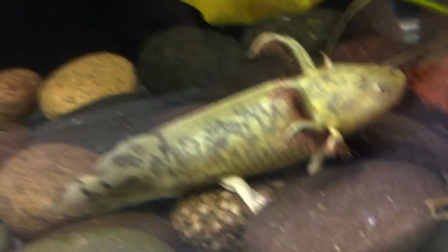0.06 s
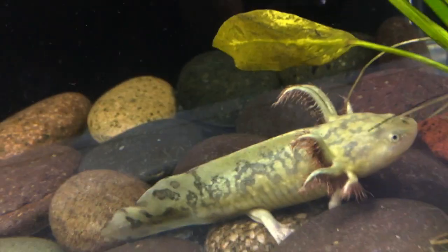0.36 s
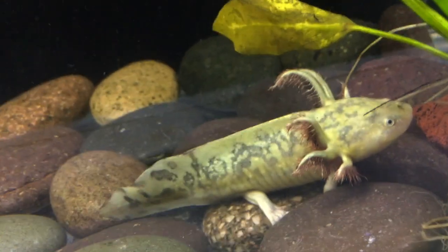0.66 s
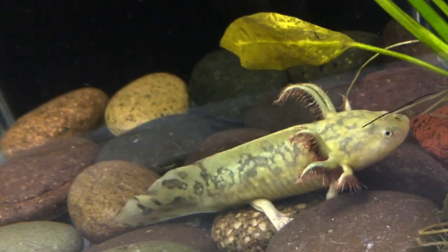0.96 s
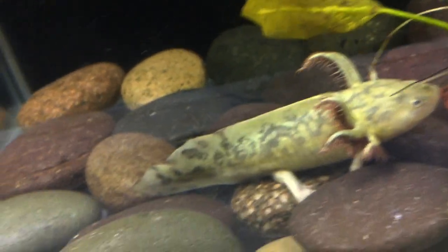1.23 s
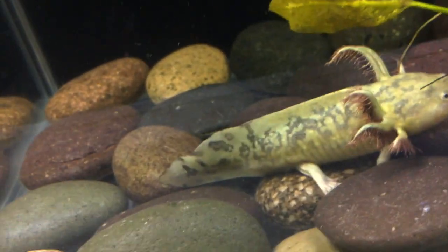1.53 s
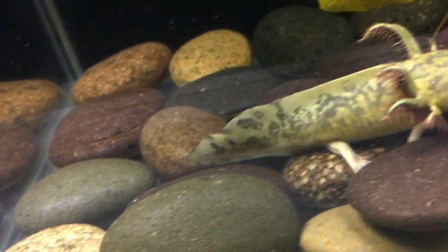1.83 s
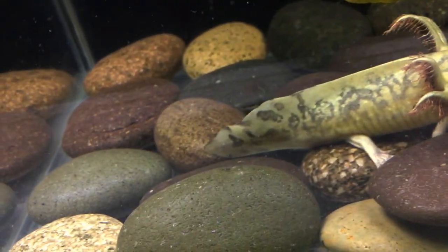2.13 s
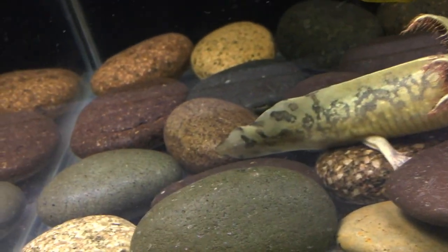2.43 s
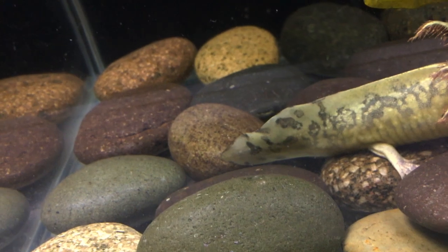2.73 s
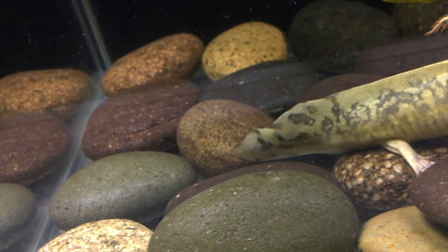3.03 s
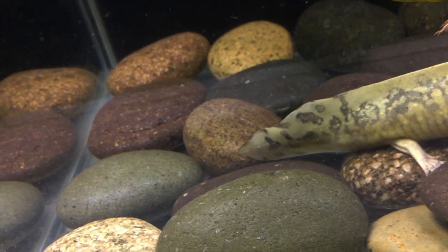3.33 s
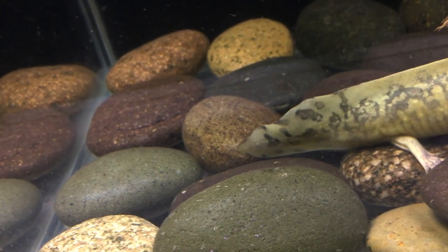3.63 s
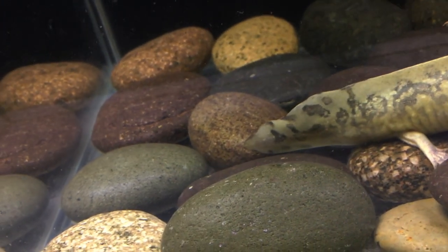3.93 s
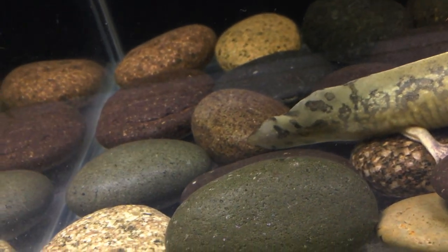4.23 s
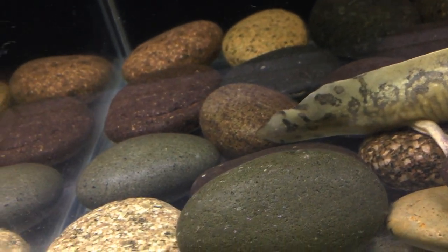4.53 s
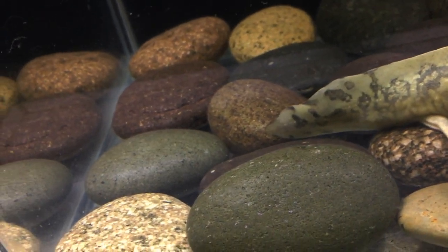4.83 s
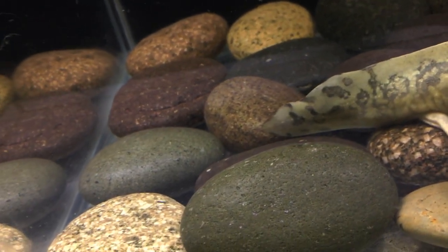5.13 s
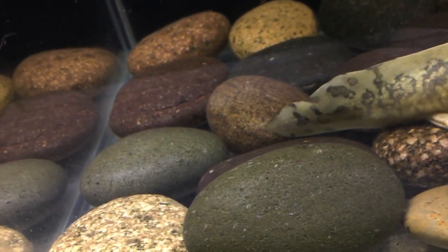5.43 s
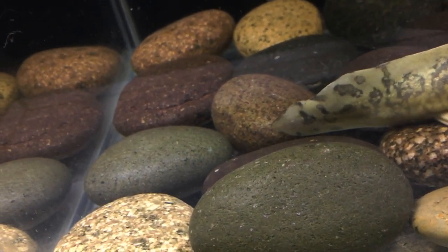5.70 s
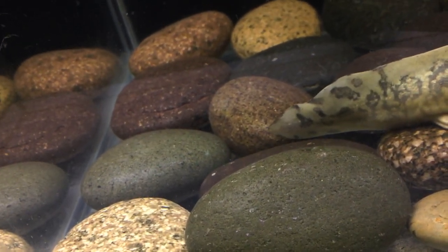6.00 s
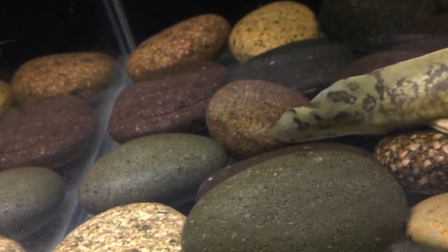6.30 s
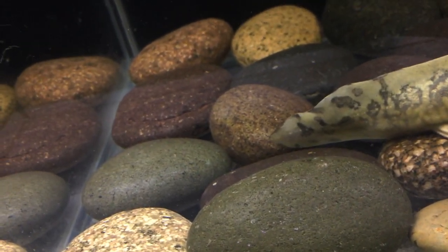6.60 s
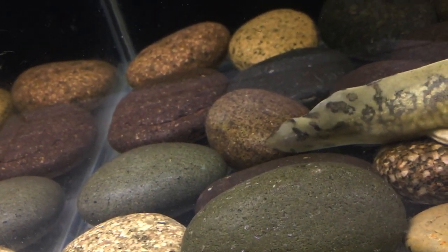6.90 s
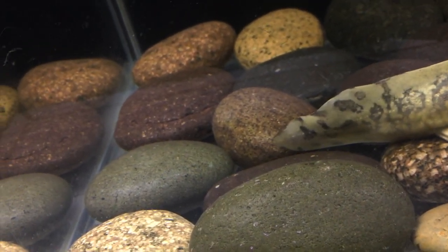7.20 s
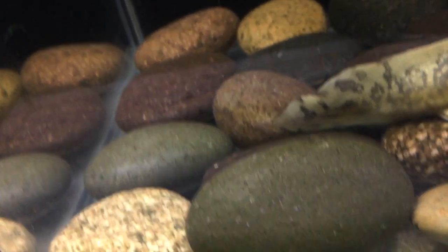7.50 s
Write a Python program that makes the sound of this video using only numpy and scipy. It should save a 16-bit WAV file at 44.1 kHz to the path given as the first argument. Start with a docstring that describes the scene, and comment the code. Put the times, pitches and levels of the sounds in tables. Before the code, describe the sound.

An aquarium pump hums and buzzes steadily in a small room, with brief plastic knocks at first, then a few soft bumps and ticks.

```python
"""An aquarium pump hums and buzzes throughout, shaken by the mains, over a low drone, hiss and bubbles.
In the first second something plastic is handled close by: it rustles, scrapes, knocks and clacks.
From about 2 to 6 seconds it gets a few softer bumps, each ringing the case and its heavy body.
A sharp tick rings near 4 seconds, as a low rumble swells, and another at 7 seconds.
The knocks, the clack and the ticks echo briefly in a small, quiet room."""
import sys
import numpy as np
from scipy import signal
from scipy.fft import rfft, irfft
from scipy.io import wavfile

SR = 44100
rng = np.random.default_rng(int(sys.argv[2]) if len(sys.argv) > 2 else 0)


def bounce(signal):
    """Save signal as a 16-bit WAV file at the path given by the first command-line argument."""
    frames = np.transpose(np.atleast_2d(signal))
    limited = np.clip(frames, -1, 1)
    pcm = np.round(limited * 32767).astype(np.int16)
    wavfile.write(sys.argv[1], SR, pcm)


N = 333011

# The room's steady hiss. Each row: frequency in Hz, level in dB per Hz.
ROOM_HISS = [(20, -77), (45, -95), (70, -88), (80, -70), (108, -71.5), (132, -87), (155, -74), (200, -80),
             (260, -74.5), (330, -81), (650, -77.5), (820, -84.5), (920, -82.5), (1400, -85), (1850, -89.5),
             (2400, -88), (2750, -95.5), (3600, -95), (4800, -101.6), (5400, -100.3), (6900, -102.0),
             (7700, -105.1), (9300, -103.6), (10450, -109.1), (11100, -105.7), (15500, -108.2)]
# How long the room echoes. Each row: frequency in Hz, seconds to fade by 60 dB.
ROOM_FADE = [(150, 0.78), (600, 0.18), (2000, 0.33), (5000, 0.17), (14000, 0.21)]
# The tone colour of bursting bubbles. Each row: frequency in Hz, relative level in dB.
FIZZ_SPECTRUM = [(3000, -20), (7000, -5), (9300, 5), (10400, -2), (11800, 3), (15500, -28)]
# How loud the low drone is. Each row: time in seconds, level in dB.
DRONE_LEVEL = [(0, -46.5), (1.9, -51.5), (2.4, -45), (3.1, -42), (3.7, -55), (4.7, -48), (5.6, -48.5),
               (6.3, -55), (7.55, -57)]
# How loud the rumble is. Each row: time in seconds, level in dB.
RUMBLE_LEVEL = [(0, -72), (3.8, -54), (4.2, -47.5), (4.7, -54.5), (7.55, -67)]
# The rumble's tones. Each row: pitch in Hz, relative level in dB, pitch wander in Hz.
RUMBLE_TONES = [(29.2, -19, .4), (40.3, -7, .6), (80, -7, 1.5), (96.5, -7, 2.5), (106.5, -7, 1.5)]
# The pump's strong tones. Each row: multiple of the mains frequency, level in dB.
PUMP_HUM = [(1, -45), (2, -53), (3, -38), (4, -55.6), (5, -53), (6, -62), (7, -63.5), (8, -68), (9, -63.5),
            (10, -59.5), (11, -67), (12, -62.5), (15, -66), (16, -76), (18, -72.5), (19, -83), (20, -71.5),
            (21, -70.5), (22, -73.5), (23, -84), (28, -70.5), (29, -85), (30, -76.5), (37, -73), (38, -77),
            (41, -72.5), (51, -75), (57, -76), (65, -76)]
# The weak pump tones in between. Each row: frequency in Hz, level in dB of each tone near it.
PUMP_BUZZ = [(700, -74.5), (1500, -73), (2400, -81), (2750, -123), (3900, -84), (4800, -93), (5500, -84.5),
             (7000, -97)]
# The tone colours of rustling and of scraping. Each row: frequency in Hz, relative level in dB.
RUSTLE_SPECTRUM = [(300, -16), (1200, 7), (2500, 6.5), (4600, 2.5), (6200, 2), (7500, -4), (8800, 0),
                   (10400, -8.5), (13000, -4), (16000, -10)]
SCRAPE_SPECTRUM = [(200, 1), (450, 24), (950, 28), (1250, 12), (1500, 3), (3500, 5), (4800, -8), (6000, 3),
                   (7200, -13), (8500, -3), (10500, -11), (11200, -4), (12300, -14), (13200, -9),
                   (16000, -18)]
# Plastic sliding between knocks. Each row: midpoint in seconds, length in seconds, level in dB.
SCRAPE_STROKES = [(0.490, 0.08, -31.5), (0.576, .07, -28.5)]
# The clicks that make the two ticks, and the two snaps of a catch that make the clack.
# Each row: start in seconds, level in dB, hardness in Hz (higher sounds brighter).
TICK_HITS = [(4.1320, -35, 15000), (4.1353, -31, 15000), (4.1412, -35, 26000), (7.0148, -37.5, 4200)]
CATCH_HITS = [(.6425, -22, 6200), (.6450, -15, 3420)]
# Knocks on plastic. Each row: start in seconds, level in dB, hardness in Hz, thud level in dB.
KNOCK_HITS = [(.4290, -32, 1200, -33), (.5100, -16, 5500, -20.5), (.5170, -15.5, 2300, -45),
              (0.56, -20.5, 1300, -27.5), (2.1911, -30.5, 1900, -31.5), (3.5113, -40, 1400, -50),
              (3.9734, -33, 1260, -37.5), (5.2406, -34, 1090, -29.5), (5.7582, -42, 1200, -31)]
# The tones that ring in a tick, the catch, the heavy body and the plastic case.
# Each row: pitch in Hz, relative level in dB, seconds to fade by 60 dB.
TICK_TONES = [(1230, 2, .033), (1870, -11, .035), (2500, -13, .015), (3278, -6, .025), (4150, -9, .02),
              (5200, -20, .01), (6121, -9, .035), (6900, -22, .01), (7763, -11, .02), (8629, -6, .025),
              (10000, -14, .01), (11200, -1, .018), (12500, -6, .016), (13490, -1, .015), (13900, -2, .015),
              (14520, -6, .016), (15500, -13, .012)]
CATCH_TONES = [(510, -6, 0.021), (1064, -5, 0.029), (1450, -26, .008), (1750, -7, 0.036),
               (2170, -3.5, 0.016), (2360, -8.5, 0.0073), (2900, -1, 0.008), (3290, -2.5, 0.01),
               (3660, -10, 0.0074), (4180, -4.5, 0.0078), (4800, -5, 0.013), (5300, -9, .01),
               (6000, -10.5, 0.011), (6800, -11.5, 0.012), (9000, -17, .006), (13000, -12.5, .008)]
BODY_TONES = [(157, -5, 0.095), (205, 5, 0.082), (298, -4.5, 0.053), (333, 2.5, 0.062), (444, -8.5, 0.031)]
CASE_TONES = [(332, -1, 0.031), (395, -16, 0.047), (458, -12, 0.11), (523, -11.5, 0.04), (652, -6.5, 0.02),
              (800, -1.5, 0.05), (1005, -1.5, 0.037), (1032, -2, 0.043), (1139, -0.5, 0.07),
              (1574, -13.5, 0.093), (1814, -6.5, 0.044), (2080, -9.5, 0.056), (2473, -15.5, 0.16),
              (2820, -13.5, 0.089), (3436, -8, 0.036), (4260, -19, 0.0089), (6200, -18.5, .015),
              (8600, -29, .015), (11000, -19, 0.018)]


def amp(db):
    """Turns decibels into a number to multiply by."""
    return 10 ** (np.asarray(db) / 20)


def unit(x):
    """Scales a signal so its average (rms) size is 1."""
    return x / np.sqrt(np.mean(x ** 2) + 1e-20)


def at_hz(points, hz):
    """Reads between a table's rows, with frequency spaced by octaves."""
    f, value = np.transpose(points)
    return np.interp(np.log(hz + 1), np.log(f + 1), value)


def over_time(points):
    """Reads a curve at every sample."""
    return np.interp(np.arange(N) / SR, *np.transpose(points))


def add(mix, start_s, sound):
    """Mixes a sound in at its start time."""
    part = mix[max(round(start_s * SR), 0):][:len(sound)]
    part += sound[:len(part)]


def noise(spectrum):
    """Noise with the tone colour of a table in dB per Hz."""
    gain = amp(at_hz(spectrum, np.fft.rfftfreq(N, 1 / SR))) * np.sqrt(SR / 2)
    return irfft(rfft(rng.standard_normal(N)) * gain, N)


def drift(rate):
    """A random wobble of size about 1, with up to `rate` swings a second."""
    times = np.arange(0, N / SR + 1, 1 / 100)
    speeds = rate * np.geomspace(1 / 10, 1, 20)[:, None]
    wobble = np.sin(2 * np.pi * (speeds * times + rng.random(speeds.shape))).sum(0)
    return np.interp(np.arange(N) / SR, times, unit(wobble))


def room_echo(sound, gap_s=0.0045):
    """The walls throw back many echoes just after the sound; each pitch fades at its own speed."""
    hz, t, bands = signal.stft(rng.standard_normal(SR // 2), SR, nperseg=256)
    fade = amp(-60 * t / at_hz(ROOM_FADE, hz)[:, None])
    tail = signal.istft(bands * fade, SR, nperseg=256)[1]
    tail *= np.clip(np.arange(len(tail)) / SR / gap_s - 1 / 2, 0, 1)
    return signal.fftconvolve(sound, tail / np.linalg.norm(tail))[:N]


def bubble_fizz(per_s=9, db=-72, spread_db=3, fade_s=0.17):
    """Tiny bubbles burst at random, each a faint puff of high hiss."""
    size_db = spread_db * np.minimum(rng.exponential(1, N), 3)
    bursts = amp(db + size_db) * (rng.random(N) < per_s / SR)
    t = np.arange(SR // 4) / SR
    fade = amp(-60 * t / fade_s)
    return signal.oaconvolve(bursts, fade)[:N] * unit(noise(FIZZ_SPECTRUM))


def wavering(hz, wander_hz):
    """A tone whose pitch wanders."""
    pitch_hz = hz + wander_hz * drift(2.5)
    return np.sqrt(2) * np.sin(2 * np.pi * np.cumsum(pitch_hz) / SR)


def drone(hz=53.0, wander_hz=0.38, swell_db=1.5):
    """A low tone throbs against the hum about seven times a second, over a rumble that swells and sinks."""
    tone = amp(over_time(DRONE_LEVEL) + swell_db * drift(1.4)) * wavering(hz, wander_hz)
    rumble = sum(amp(db) * wavering(f, wander) for f, db, wander in RUMBLE_TONES)
    return tone + amp(over_time(RUMBLE_LEVEL)) * rumble


def pump(mains_hz=59.954, hum_flutter=0.021, buzz_flutter=0.24):
    """Every mains cycle shakes the pump the same way; the high buzz flutters more than the low hum."""
    multiples = np.arange(1, 120)
    level_db = at_hz(PUMP_BUZZ, multiples * mains_hz)
    for multiple, db in PUMP_HUM:
        level_db[round(multiple) - 1] = db
    tones = np.sqrt(2) * amp(level_db) * np.exp(2j * np.pi * rng.random(len(multiples)))
    # Build one cycle of each tone, then repeat it.
    place = np.linspace(0, 1, 4097)
    cycle = (tones[:, None] * np.exp(2j * np.pi * multiples[:, None] * place)).real
    place_now = np.arange(N) * mains_hz / SR % 1
    hum = np.interp(place_now, place, cycle[multiples <= 5].sum(0))
    buzz = np.interp(place_now, place, cycle[multiples > 5].sum(0))
    return hum * (1 + hum_flutter * drift(1.4)) + buzz * (1 + buzz_flutter * drift(4.1))


def rustle(db=-55, rise_s=0.09, fade_from_s=0.17, fade_db_per_s=10, grain_db=2.0):
    """Handled plastic makes a soft, uneven noise that sets in quickly and dies away."""
    t = np.arange(N) / SR
    level_db = db - fade_db_per_s * np.maximum(t - fade_from_s, 0)
    loudness = np.minimum(t / rise_s, 1) * amp(level_db + grain_db * drift(74))
    return unit(noise(RUSTLE_SPECTRUM)) * loudness


def scrapes(grain_db=1.5):
    """Plastic slides twice, each time with a short swell of rough noise."""
    pressure = np.zeros(N)
    for middle_s, length_s, db in SCRAPE_STROKES:
        add(pressure, middle_s - length_s / 2, amp(db) * np.hanning(round(length_s * SR)))
    return pressure * unit(noise(SCRAPE_SPECTRUM)) * amp(grain_db * drift(46.2))


def ring(tones, scatter, rattle, rattle_s):
    """One blow: fading tones, their pitches scattered a little, and a brief rattle of the same colour."""
    t = np.arange(SR // 4) / SR
    hz, db, fade_s = np.transpose(tones)[:, :, None]
    detune = 1 + scatter * rng.standard_normal(hz.shape)
    sign = (-1) ** np.arange(len(tones))[:, None]
    ringing = (sign * amp(db - 60 * t / fade_s) * np.sin(2 * np.pi * hz * detune * t)).sum(0)
    f = np.fft.rfftfreq(len(t), 1 / SR)
    bass_cut = f ** 2 / (f ** 2 + hz.min() ** 2)
    colour = amp(at_hz(np.array(tones)[:, :2], f)) * bass_cut
    grit = unit(irfft(rfft(rng.standard_normal(len(t))) * colour, len(t)))
    return ringing + rattle * grit * amp(-60 * t / rattle_s)


def strikes(hits, tones, scatter, rattle, rattle_s):
    """Blows on one object; a softer touch takes the treble away."""
    out = np.zeros(N)
    for start_s, db, hardness_hz in hits:
        soften = signal.butter(2, min(hardness_hz, SR / 2 - 1000), fs=SR)
        blow = ring(tones, scatter, rattle, rattle_s)
        add(out, start_s, amp(db) * signal.lfilter(*soften, blow))
    return out


def slip_hits(count=5, offset_db=-1.5, spread_db=2, hardness_hz=890):
    """Sliding plastic sticks and slips: lists small, unevenly spaced hits along each scrape."""
    hits = []
    for middle_s, length_s, db in SCRAPE_STROKES:
        places = (np.arange(count) + rng.random(count)) / count - 1 / 2
        sizes_db = db + offset_db - spread_db * rng.standard_normal(count)
        hits += [(middle_s + length_s * at, size, hardness_hz) for at, size in zip(places, sizes_db)]
    return hits


def body_thuds(lag_s=0.00888, muffle_hz=600):
    """The heavy body answers each knock a moment later with a short, low boom."""
    out = np.zeros(N)
    for start_s, _, _, db in KNOCK_HITS:
        add(out, start_s + lag_s, amp(db) * ring(BODY_TONES, scatter=0.088, rattle=1.0, rattle_s=0.041))
    return signal.sosfilt(signal.butter(2, muffle_hz, fs=SR, output="sos"), out)


def case_knocks(bounce_s=0.004, bounce_db=-6):
    """The plastic case rings with each knock, its one weaker bounce, and the slips of the scrapes."""
    hits = []
    for start_s, db, hardness_hz, _ in KNOCK_HITS:
        hits += [(start_s, db, hardness_hz), (start_s + bounce_s, db + bounce_db, hardness_hz)]
    return strikes(hits + slip_hits(), CASE_TONES, scatter=0.015, rattle=0.8, rattle_s=0.03)


def scene():
    """Mixes the close sounds and their echoes with the pump and the background."""
    knocks = case_knocks() + body_thuds()
    clack = strikes(CATCH_HITS, CATCH_TONES, scatter=0.0084, rattle=1.0, rattle_s=0.008)
    ticks = strikes(TICK_HITS, TICK_TONES, scatter=0.0014, rattle=0.56, rattle_s=0.075)
    echoes = room_echo(amp(-9.0) * knocks + amp(-7.5) * clack + amp(-9.0) * ticks)
    steady = pump() + drone() + noise(ROOM_HISS) + bubble_fizz()
    return (steady + rustle() + scrapes() + knocks + clack + ticks + echoes)[None]


def record(dry):
    """Cuts away the very highest treble."""
    treble_cut = signal.firwin(1023, cutoff=15740, window=("kaiser", 9), fs=SR)
    return signal.oaconvolve(dry, treble_cut[None], "same")


dry = scene()
out = record(dry)
bounce(out)
```